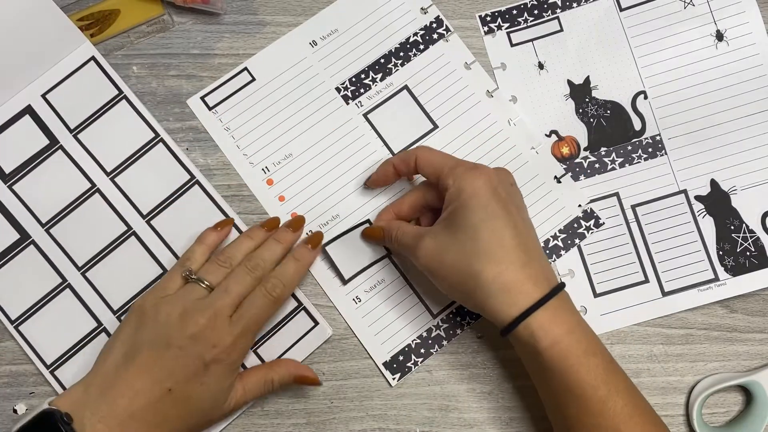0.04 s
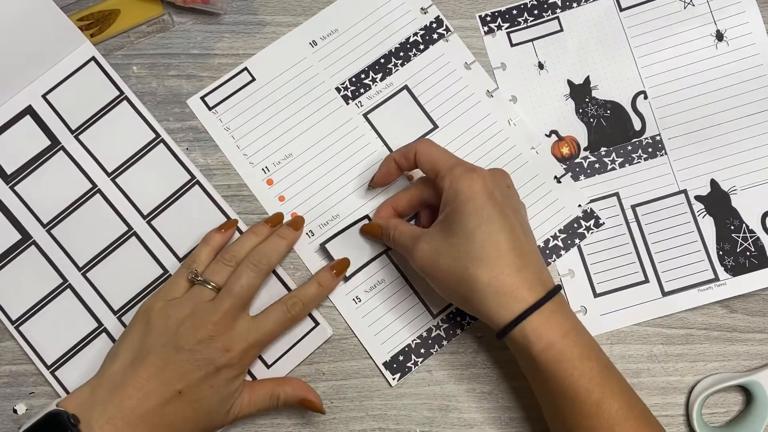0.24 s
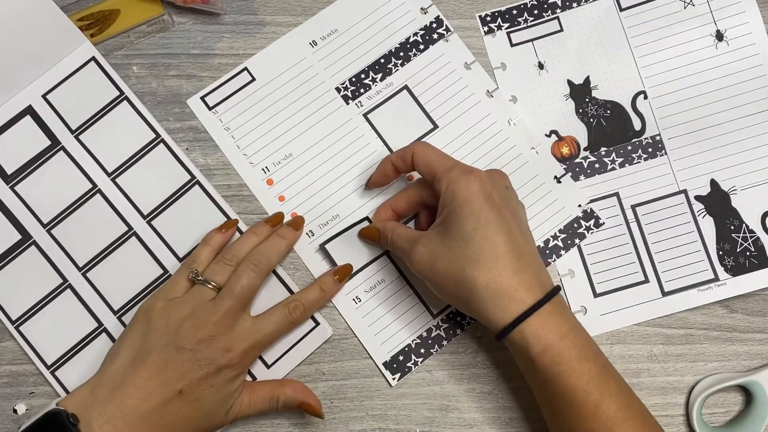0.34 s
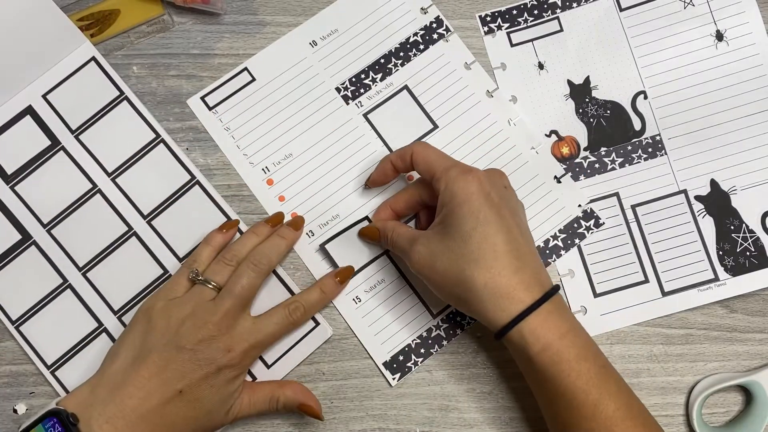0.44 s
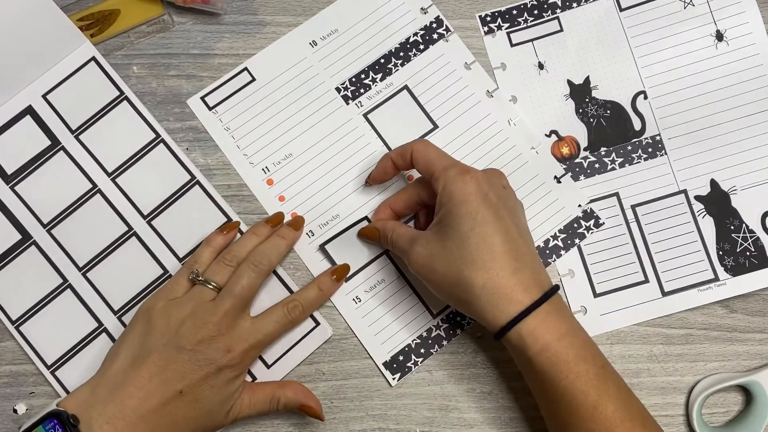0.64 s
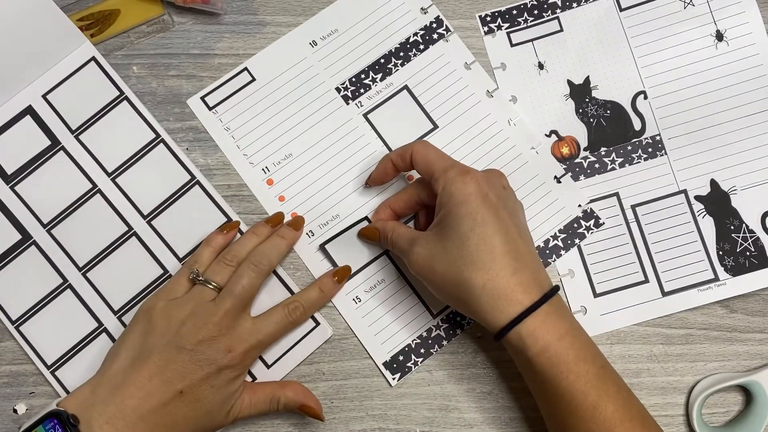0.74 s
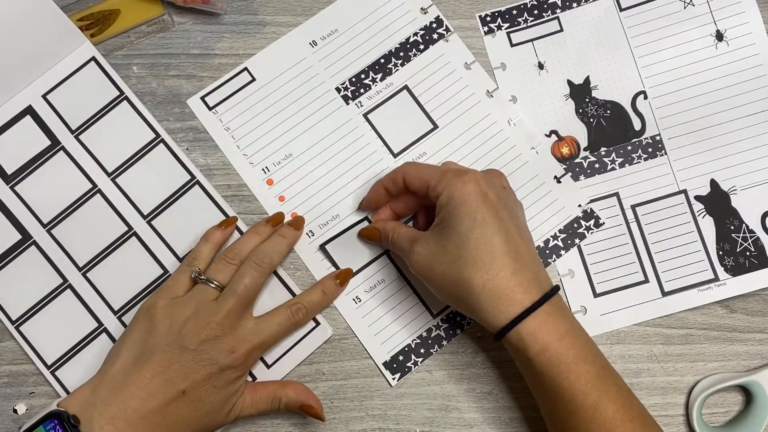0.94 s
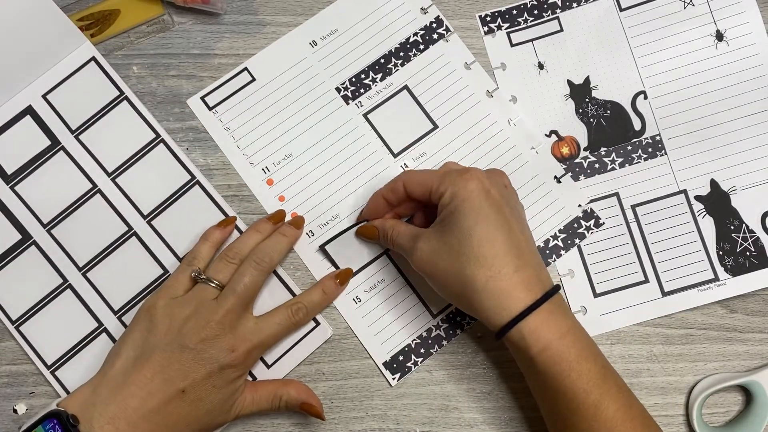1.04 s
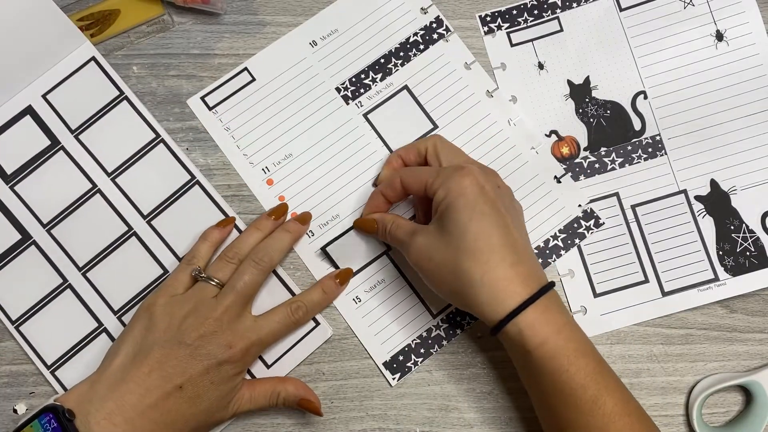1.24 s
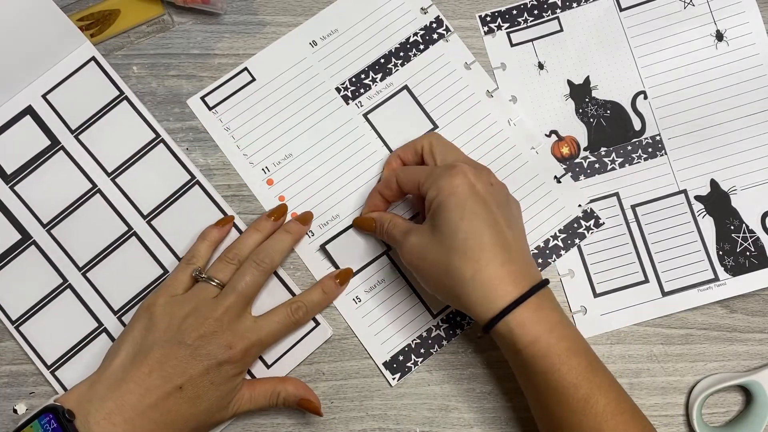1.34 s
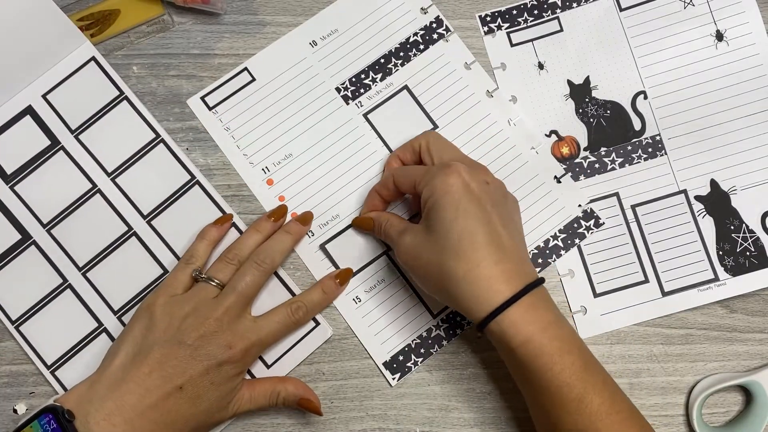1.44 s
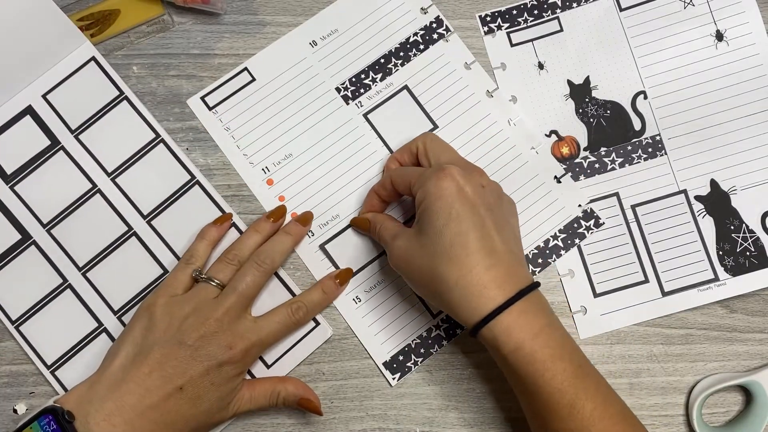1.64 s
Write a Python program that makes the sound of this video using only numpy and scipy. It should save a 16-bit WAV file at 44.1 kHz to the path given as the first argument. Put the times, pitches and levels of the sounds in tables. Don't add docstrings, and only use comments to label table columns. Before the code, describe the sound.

A sticker handled on a paper page: tiny glue crackles and a soft table touch, then a loud, sharp snap with a dull knock, then faint ticks; close phone microphone in a small room with low hum.

```python
import sys
import numpy as np
from scipy import signal
from scipy.fft import rfft, irfft
from scipy.io import wavfile
from scipy.ndimage import uniform_filter1d

SR = 44100
rng = np.random.default_rng(int(sys.argv[2]) if len(sys.argv) > 2 else 0)


def transcribe(signal):
    frames = np.atleast_2d(signal).T
    limited = np.clip(frames, -1, 1)
    pcm = np.round(limited * 32767).astype(np.int16)
    wavfile.write(sys.argv[1], SR, pcm)


def undo_db(level):
    steps = np.asarray(level, float) / 20
    return 10 ** steps


N = 74970

# (time [s], level [dB], pitch [Hz])
MACHINE_HUM = [(0.0, -52.5, 60.7), (0.07, -57.5, 58.46), (0.15, -58, 54.14), (0.232, -43.5, 54.3),
               (0.288, -54.5, 54.1), (0.392, -42, 53.67), (0.478, -51, 55.2), (0.538, -42, 53.6),
               (0.6, -47, 55.27), (0.876, -41.5, 54.25), (1.154, -48.5, 57.37), (1.216, -54, 57.13),
               (1.372, -48, 59.36), (1.444, -58, 63.1), (1.472, -69, 59.37), (1.7, -55, 61)]
# (frequency [Hz], density [dB per Hz])
AIR_COLOUR = [(40, 2.5), (110, -3.5), (170, -14.5), (500, -18.5), (900, -26.5), (2400, -45.5),
              (12500, -57.5), (14500, -81)]
# (centre [Hz], width [Hz], level [dB])
ROOM_BOOMS = [(62, 42, -61), (103.5, 18, -62.5), (122, 60, -63.5), (263.2, 49, -72), (359.8, 42, -72.5),
              (576.3, 48, -80.5), (662.5, 53, -81), (839.6, 25, -82.5), (1770, 150, -87)]
# (frequency [Hz], phase [rad])
PORT_LEAD = [(0, 0), (2000, .5), (2500, .9), (2800, -1.3), (3100, .8), (4600, -.2), (7300, 3.14),
             (13500, 9.42), (17000, 13)]
# (frequency [Hz], difference [dB])
HAND_SHADE = [(300, -3.5), (700, 9), (1300, 3.5), (2400, -5), (4400, 1), (16000, -0.5)]
# (frequency [Hz], level [dB])
PAPER_COLOUR = [(1200, -19), (2500, 1), (3800, -13.5), (5600, 0.5), (7200, -2.5), (10500, -8.5),
                (15000, -8.5), (16400, -30)]
# (time [s], level [dB])
FINGER_PRESSURE = [(0, -72.5), (0.038, -74.5), (.1, -85), (.13, -82), (.2, -96), (.4, -83), (0.428, -77),
                   (.46, -112), (0.579, -89), (.6, -73), (0.652, -90), (0.781, -82.5), (.82, -100),
                   (0.931, -89.5), (0.982, -72.5), (1.04, -64), (1.199, -77.5), (1.3, -100)]
# (time [s], peak level [dB], mode [Hz], t60 [s])
TABLE_THUDS = [
    (.268, -52, 240, .04),
    (1.022, -48, 270, .04),
    (1.0835, -40, 480, .03),
    (1.082, -47, 260, .04),
]
# (time [s], level [dB], length [s], centre
# [Hz], width [Hz])
NAIL_TICKS = [(.135, -80, .02, 1700, 400), (.435, -78, .03, 1350, 600), (.8752, -57, .003, 2200, 900),
              (.8752, -64, .004, 1400, 700), (.8752, -73, .002, 3300, 700), (1.1832, -60, .007, 5500, 800),
              (.105, -86, .05, 14800, 1500), (1.012, -80, .05, 14800, 1500), (1.1832, -58, .007, 4270, 350),
              (1.1832, -63, .007, 3200, 700), (1.5835, -65, .004, 2280, 600),
              (1.5835, -70, .004, 1600, 500)]
# (time [s], level [dB], length [s], centre [Hz], width [Hz])
GLUE_CRACKLES = [(0.0192, -55.5, 0.001, 8000, 9000), (0.2626, -50.5, 0.015, 9230, 10700),
                 (0.549, -79, 0.0045, 5500, 3000), (.292, -71, 0.023, 5100, 2000),
                 (.94, -78.5, .012, 2337, 2310), (0.9666, -63.5, .006, 3340, 4000),
                 (.975, -72.5, .012, 3704, 4830), (1.0010, -55.5, .006, 9000, 12000),
                 (1.057, -56.5, 0.0053, 9000, 12000), (1.067, -51.5, 0.012, 7000, 11720),
                 (1.1822, -55.5, 0.0053, 4500, 7560), (1.3663, -60.5, 0.0019, 11420, 7945),
                 (1.375, -83, 0.022, 10180, 6050)]
# (delay [s], level [dB])
SNAP_RETURNS = [(-.0004, -16), (-.0002, -10), (0, 0), (.0009, -10), (.0016, -10), (.0026, -16),
                (.0035, -18), (.0046, -18), (.0062, -18), (.0097, -23), (.0123, -27)]
# (frequency [Hz], level [dB], t60 [s])
SNAP_MODES = [(1000, -34, 0.014), (1925, -22, 0.0086), (2222, -19, 0.0076), (3240, -16.5, 0.0069),
              (4213, -7, 0.0046), (5900, 2, 0.0041), (7370, 0, 0.002123), (10130, 1.5, 0.0013),
              (12030, -1, .002), (14800, -8, .002)]


def colour(x, points):
    p = np.array(points, float)
    hz = np.arange(N // 2 + 1) * SR / N + 1
    gain_db = np.interp(np.log(hz), np.log(p[:, 0]), p[:, 1], left=-90)
    return irfft(rfft(x) * undo_db(gain_db), N)


def level(x, db):
    return x * undo_db(db) / np.sqrt(np.mean(x ** 2))


def band(x, hz, width):
    return signal.lfilter(*signal.iirpeak(min(hz, .4 * SR), hz / width, fs=SR), x)


def ring(x, hz, t60):
    pole = np.exp(2j * np.pi * hz / SR - np.log(1000) / (t60 * SR))
    return signal.lfilter([1], [1, -pole], x).imag


def click(s):
    k = np.arange(N) - s * SR
    return np.sinc(k) * np.exp(-(k / 6) ** 2)


def walk(rate):
    hold = int(SR / rate)
    steps = np.repeat(rng.standard_normal(N // hold + 1), hold)
    return 1.6 * uniform_filter1d(uniform_filter1d(steps, hold), hold)[:N]


def grit(spread_db):
    sizes = undo_db(spread_db * rng.exponential(size=N))
    return level(rng.standard_normal(N) * sizes, 0)


def bursts(t, table, g):
    attack_s, release_s = .0006, .003
    out = 0
    for s, db, length, hz, width in table:
        fade = np.exp(-np.maximum(t - s - length, 0) / release_s)
        env = np.clip((t - s) / attack_s, 0, 1) * fade
        burst = env * g
        for _ in range(3):
            burst = band(burst, hz, 1.2 * width)
        out = out + undo_db(db) * burst * np.sqrt(np.sum(env ** 2) / np.sum(burst ** 2))
    return out


def ports(x):
    p = np.array(PORT_LEAD, float)
    lead = np.interp(np.arange(N // 2 + 1) * SR / N, p[:, 0], p[:, 1])
    return np.array([x, irfft(rfft(x) * np.exp(-1j * lead), N)])


def apart(x):
    alike_below_hz, paired_above_hz = 415, 3500
    x = signal.sosfilt(signal.butter(2, alike_below_hz, "high", fs=SR, output="sos"), x)
    x = signal.sosfilt(signal.butter(3, paired_above_hz, fs=SR, output="sos"), x)
    return x * np.array([[1], [-1]])


def tilt(pair):
    q = np.vstack([[20, 0], HAND_SHADE, [SR / 2, 0]])
    return np.array([colour(pair[0], q * [1, .5]), colour(pair[1], q * [1, -.5])])


def machine(t):
    p = np.array(MACHINE_HUM)
    pitch = np.interp(t, p[:, 0], p[:, 2]) * (1 + 0.0091 * walk(6.2))
    turn = 2 * np.pi * np.cumsum(pitch) / SR
    hum = np.sqrt(2) * undo_db(np.interp(t, p[:, 0], p[:, 1])) * np.sin(turn)
    octave_db = -19 - 52 + 1.5 * walk(18)
    hum = hum + undo_db(octave_db) * np.sin(2 * turn)
    noise = rng.standard_normal((2, N))
    air = level(colour(noise, AIR_COLOUR), -55)
    for hz, width, db in ROOM_BOOMS:
        boom = band(band(noise, hz, width), hz, 2 * width)
        air = air + level(boom, db) * undo_db(0.5 * walk(11))
    return hum + ports(air[0]) + 0.99 * apart(air[1])


def room(x):
    room_db, t60_s, treble_t60_s, late_s = -16, .25, .15, .016
    t = np.arange(SR // 2) / SR
    noise = rng.standard_normal((2, len(t))) * np.clip(t / late_s, 0, 1)
    low = signal.lfilter(*signal.butter(1, 5000, fs=SR), noise)
    tail = low * undo_db(-60 * t / t60_s) + (noise - low) * undo_db(-60 * t / treble_t60_s)
    tail = tail / np.sqrt(np.sum(tail ** 2) / 2)
    wet = signal.fftconvolve(x[None], tail, axes=1)[:, :N] * undo_db(room_db)
    return ports(wet[0]) + .7 * apart(wet[1])


def slide(t):
    p = np.array(FINGER_PRESSURE)
    skin = level(colour(grit(0.6), PAPER_COLOUR), -5)
    skin = skin + 2.4 * band(skin, 5300, 810)
    skin = signal.sosfilt(signal.butter(6, 12800, fs=SR, output="sos"), skin)
    return skin * undo_db(np.interp(t, p[:, 0], p[:, 1]) + 2.2 * walk(60))


def thuds():
    out = 0
    for s, db, hz, t60 in TABLE_THUDS:
        knock = ring(band(click(s), hz, hz), hz, t60)
        out = out + undo_db(db) * knock / np.abs(knock).max()
    return out


def crackles(t):
    g = grit(-2.5)
    return bursts(t, GLUE_CRACKLES, colour(g, PAPER_COLOUR)) + bursts(t, NAIL_TICKS, g)


def snap(t):
    snap_s, snap_db = 1.0802, -4
    scatter_db, scatter_t60_s = -30, .02
    hits = 0
    for k, (late, db) in enumerate(SNAP_RETURNS):
        hits = hits + (-1) ** k * undo_db(db) * click(snap_s + late)
    decay = (t > snap_s) * undo_db(-60 * np.abs(t - snap_s) / scatter_t60_s)
    hits = hits + undo_db(scatter_db) * decay * grit(1.3)
    rung = 0
    for k, (hz, db, t60) in enumerate(SNAP_MODES):
        rung = rung + (-1) ** k * undo_db(db) * ring(hits, hz, t60)
    return undo_db(snap_db) * rung / np.abs(rung).max()


def scene():
    t = np.arange(N) / SR
    near = slide(t) + thuds() + crackles(t) + snap(t)
    return machine(t) + room(near) + tilt(ports(near))


def top_cut(x):
    return signal.sosfilt(signal.butter(12, 16970, fs=SR, output="sos"), x)


def record(dry):
    x = signal.sosfilt(signal.ellip(8, .2, 60, 16100, fs=SR, output="sos"), dry)
    x = signal.sosfilt(signal.butter(4, 36, "high", fs=SR, output="sos"), x)
    return top_cut(x)


dry = scene()
out = record(dry)
transcribe(out)
```